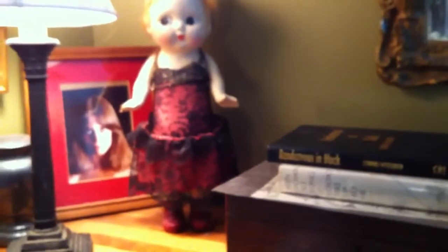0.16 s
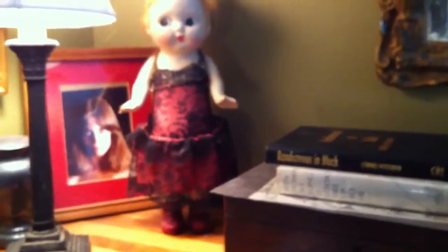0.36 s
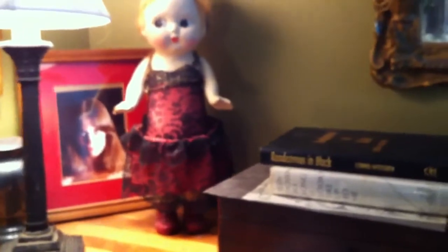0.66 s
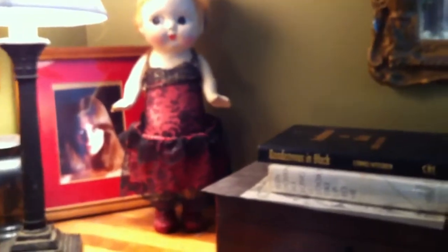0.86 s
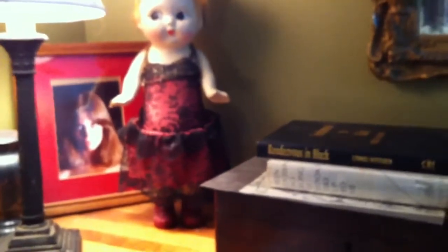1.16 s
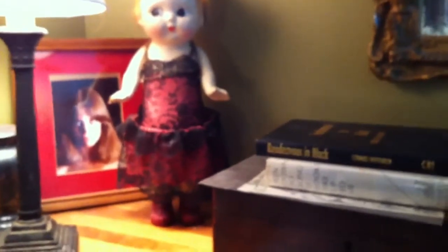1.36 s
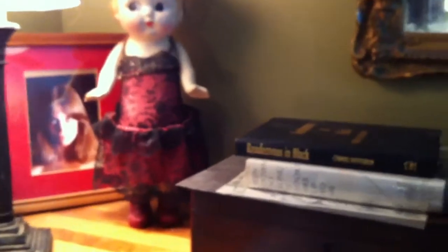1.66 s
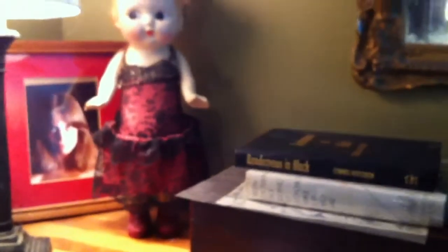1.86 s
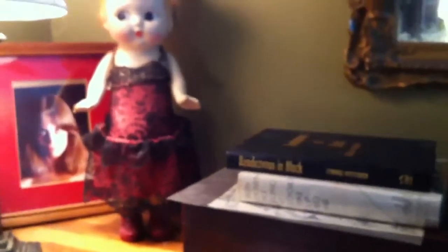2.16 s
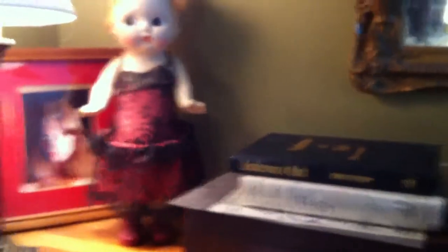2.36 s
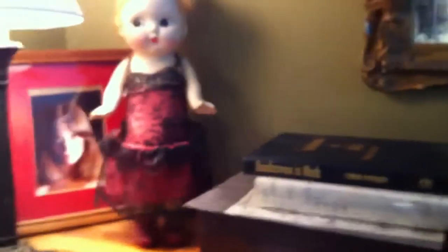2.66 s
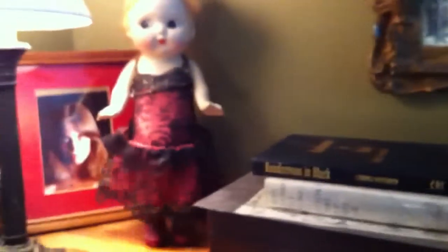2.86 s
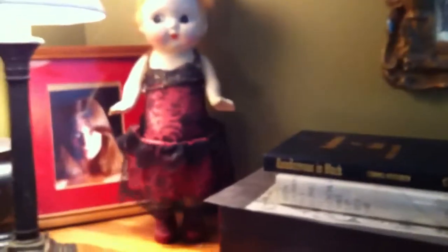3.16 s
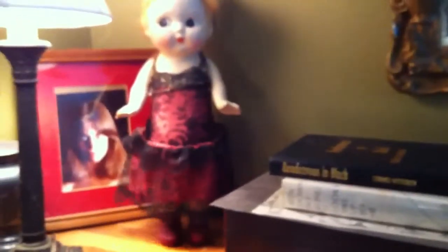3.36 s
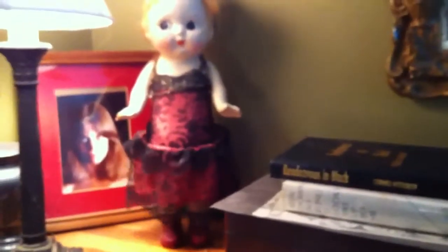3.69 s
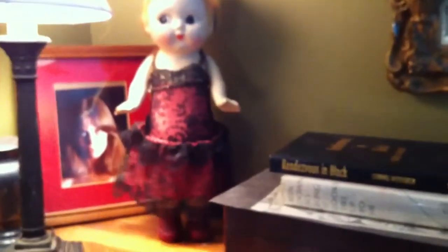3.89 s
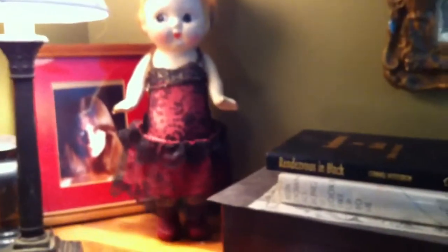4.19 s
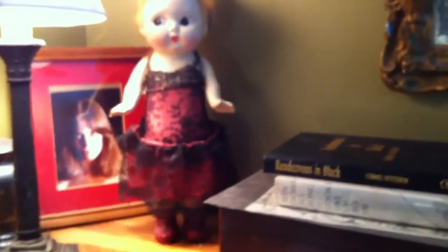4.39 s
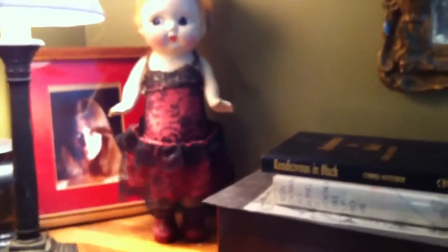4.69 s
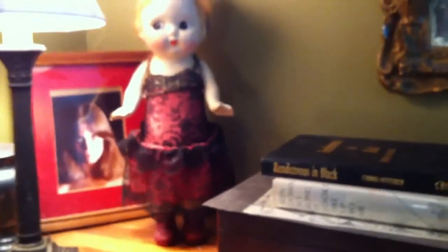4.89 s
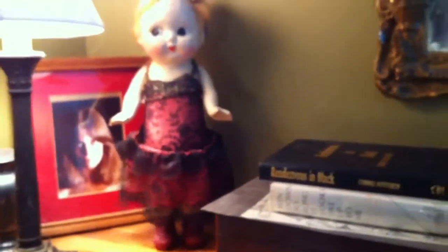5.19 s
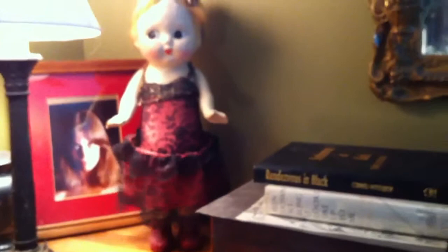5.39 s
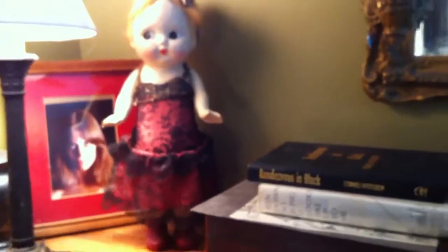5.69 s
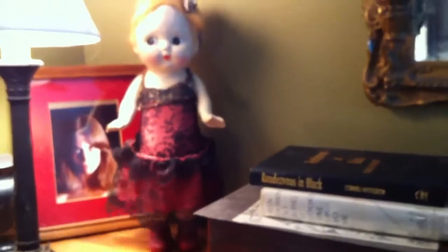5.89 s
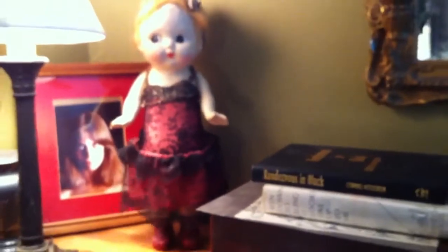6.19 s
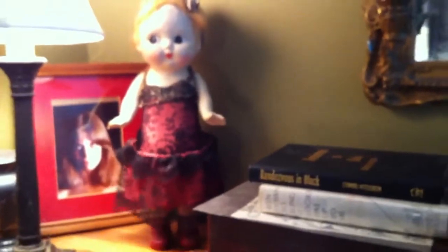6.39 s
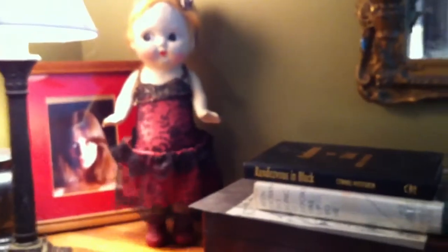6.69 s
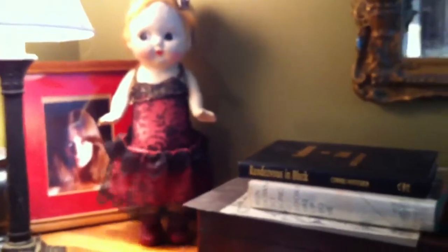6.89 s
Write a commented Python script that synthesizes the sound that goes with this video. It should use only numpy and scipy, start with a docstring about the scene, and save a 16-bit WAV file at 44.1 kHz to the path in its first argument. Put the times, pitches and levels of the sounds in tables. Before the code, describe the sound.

A quiet small room, heard closely through a small microphone with thin bass and low steady hiss. From 0 to 1.3 s there is almost nothing: a very faint, dull, even patter of about six pats a second, slight rustles and a tiny creak near 1.2 s. At 1.35 s a soft, airy brushing hiss swells, catches with a small snag at 1.8 s and trails off. At 2.05 s comes a short low juddering skid with a scrape, then two hard, cracking, boomy knocks on the wooden dresser at 2.35 and 2.55 s. Clockwork begins at 2.6 s: bright metallic chattering clicks, tick and tock in uneven pairs, roughly eight to ten a second, each with a tiny woody thud. The pace loosens around 3.7 to 4.7 s, tightens after 5 s, and loosens slightly near the end. Force varies from click to click. Very soft bumps fall near 3.7 and 6 s. It is still ticking at 7 s.

```python
"""A wooden dresser in a quiet room: a wind-up doll stands on it, heard through a small microphone close by.
A soft brushing hiss (shaped noise), a skidding shove and two knocks on the wood (ringing modes under noise
cracks) come first. Then the clockwork goes tick-tock in uneven pairs: each beat is a brief metal chatter
ringing the doll's shell, with a small thud below. Harder beats are brighter. A faint patter keeps an even
pace; slight rustles, creaks and bumps, a room tail and steady noise complete the scene."""
import sys
import numpy as np
from scipy import signal
from scipy.fft import rfft, irfft
from scipy.io import wavfile

SR = 44100
rng = np.random.default_rng(int(sys.argv[2]) if len(sys.argv) > 2 else 0)


def master_out(mix):
    """Clip the mix to full scale and print it as 16-bit PCM to the path in sys.argv[1]."""
    frames = np.transpose(np.atleast_2d(mix))
    ceiling = np.clip(frames, -1, 1)
    pcm = np.round(ceiling * 32767).astype(np.int16)
    wavfile.write(sys.argv[1], SR, pcm)


N = 310905

# beats of the clockwork, tick and tock by turns: nominal peak [t/s, level/dB]
BEATS = [(2.6058, -30), (2.6909, -25.5), (2.8217, -28), (2.9231, -28), (3.056, -28), (3.1515, -28.5),
         (3.285, -26.5), (3.382, -26), (3.5099, -26.5), (3.6384, -30.5), (3.8411, -27.5), (3.9422, -28.5),
         (4.1398, -26.5), (4.2444, -28.5), (4.4487, -27), (4.5609, -28.5), (4.7381, -25.5), (4.8405, -28.5),
         (4.9896, -27), (5.0818, -28.5), (5.2237, -24.5), (5.3178, -26), (5.4366, -26.5), (5.532, -26.5),
         (5.6487, -27), (5.7369, -26.5), (5.8564, -27), (5.9474, -30), (6.067, -27), (6.1493, -28),
         (6.2844, -29), (6.3762, -29), (6.5219, -25.5), (6.6184, -27.5), (6.8425, -27), (6.932, -24.5)]
# an ordinary tick, then tock [peak over rms/dB, brightness/dB per octave, thud level/dB]
STROKES = [(13.2, -0.9, -57), (13.9, 1.85, -62.5)]
# slow drift in the brightness of the chatter [t/s, tilt/dB per octave]
BRIGHTNESS_DRIFT = [(2.8, 1.3), (3.1, -0.3), (3.9, 1), (5.3, -0.26), (6.1, -0.7), (6.9, -0.8)]
# resonances of works and shell [f/Hz, width/Hz, level in a tick/dB, level in a tock/dB]
SHELL_MODES = [(1348, 33, -17.5, -12.5), (1760, 136, -9.5, -14.5), (2066, 670, -15.5, -19.5),
               (2453, 107, -11.5, -14), (2965, 230, -26, -17), (3520, 320, -16.5, -14),
               (5110, 546, -9.5, -8), (5910, 324, -8, -9.5), (6290, 220, -9, -14), (6985, 233, -5, -6.5),
               (8450, 630, -4, -4), (9260, 100, -1, -1), (9440, 175, -7.5, -8.5), (11270, 1140, -6, -9.5),
               (12530, 560, -1.5, -11.5), (14300, 500, -35, -56), (14520, 570, -7, -9.5)]
# resonances of the doll standing on the wood [f/Hz, width/Hz, level in a tick/dB, level in a tock/dB]
STANCE_MODES = [(155, 15.2, 0.5, -6.5), (220, 22.5, -1.5, -11.5), (290.5, 18.5, 5.5, -2),
                (340, 31.6, -4, -3.5), (398, 27.7, -2.5, 0), (475, 51, -10, -6), (638, 69, -19, -14),
                (946, 34, -24, -11)]
# soft low bumps of the doll on the wood [t/s, level/dB]
BUMPS = [(3.705, -62.5), (6.015, -64.5)]
# knocks on the dresser [t/s, boom level/dB, crack level/dB, crack brightness/dB per octave]
KNOCKS = [(2.3478, -26, -31, -2), (2.5528, -24.5, -28.5, -2)]
# modes of the dresser [f/Hz, width/Hz, level in first knock/dB, level in second knock/dB]
WOOD_MODES = [(154.8, 21, 0.5, -2), (195.2, 15, 3, 1), (229, 26.5, -2, -3.5), (267, 27, -7, 3),
              (278, 6.5, 6, 10.5), (291.7, 2.04, 1.5, 3.5), (387, 12.2, -1.5, 5), (414, 48, -7.5, -10),
              (467, 20, -7, -1.5), (557, 9.9, -15, -4.5), (610, 35, -12, -18), (667, 26, -14, -8),
              (724, 27, -9, -7), (718, 29, -3, -11.5), (866, 6.9, -14, -13), (885, 18, -34, -8.5),
              (1030, 26, -22, -29), (1050, 27, -23.5, -15), (1206, 12, -18.5, -23), (1300, 18, -27, -35),
              (1670, 33, -21, -33.5)]
# spectrum of a crack, also used for scrape and rustles [f/Hz, density/dB per Hz]
CRACK_COLOUR = [(100, 2.5), (400, 6.5), (800, -0.5), (1100, 1.5), (1700, -1), (2700, -1.5), (3300, -1),
                (4000, -6), (5000, -5), (8000, -6), (11000, -7)]
# spectrum of the crowd of weaker panel modes [f/Hz, density/dB per Hz]
PANEL_COLOUR = [(30, 6), (160, -1), (400, 7), (800, -1), (1100, -9), (1600, -11.5), (2500, -20),
                (4000, -42), (8000, -57)]
# spectrum of the brushing hiss [f/Hz, density/dB per Hz]
BRUSH_COLOUR = [(59, -49), (100, -24), (202, -4.5), (322, -8), (373, -2.5), (452, -12), (662, -7),
                (1170, -9.5), (2040, -8), (12700, -6.5), (16000, -10)]
# spectrum of a pat before its tilt [f/Hz, density/dB per Hz]
PAT_COLOUR = [(100, -12), (250, -6.5), (400, 1.5), (680, 4.5), (950, -9.5), (1700, -20.5), (3500, -14),
              (9000, -32)]
# loudness of the patter over time [t/s, level/dB]
PAT_LEVEL = [(.1, -66.5), (.45, -73), (.9, -73), (1.25, -64), (1.9, -68), (3.4, -75), (4.35, -66),
             (4.9, -71.5), (7, -80.5)]
# faint rustles of handling [t/s, level/dB, length/s]
RUSTLES = [(0.126, -69, 0.063), (0.593, -70, 0.051), (.745, -75, .04), (1.07, -68.5, 0.043)]
# faint creaks [t/s, f/Hz, width/Hz, level/dB, length/s]
CREAKS = [(1.189, 1750, 110, -70.5, 0.073), (1.198, 1600, 80, -70.5, 0.11), (4.26, 1100, 130, -68.5, 0.061)]
# reverberation of the room [f/Hz, time to fall 60 dB/s]
ROOM_DECAY = [(150, 0.34), (400, 0.46), (1200, 0.39), (3000, 0.32), (8000, 0.2), (16000, 0.2)]
# spectrum of the steady noise floor [f/Hz, density/dB per Hz]
FLOOR_COLOUR = [(15, -33.5), (25, -7), (49, -17.5), (170, -4), (405, -7.5), (575, -10), (796, -11),
                (1480, -13), (1610, -13.5), (2110, -15), (2690, -16), (3160, -15), (6560, -16.5),
                (13200, -16.5), (16000, -16.5)]

USUAL_DB = -27  # peak of an ordinary beat
BRIGHT_PER_DB, THUD_PER_DB = 0.76, 0.1  # what each dB of extra force adds to brightness and thud
LINGER_DB, LINGER_S = 20, 0.087  # the second knock's boom lingers under the first beats, then fades
BRUSH_START_S, BRUSH_ATTACK_S, BRUSH_HOLD_S, BRUSH_RELEASE_S = 1.346, 0.3, 0.18, 0.037
BRUSH_DB, TRAIL_SHARE, TRAIL_S = -56, 0.39, 0.44
PAT_START_S, PAT_RATE_HZ, PAT_SCATTER_DB = .114, 6.35, 1.1
PAT_BRIGHT_DB = -2.5  # tilt, dB an octave
FLOOR_DB, EDGE_HZ = -66.8, 15850  # steady noise level, top of the microphone's band


def amp(db):
    """Turns dB into a linear gain."""
    return 10 ** (np.asarray(db) / 20)


def unit(x):
    """Scales a sound to rms 1."""
    return x / np.sqrt(np.mean(x ** 2) + 1e-20)


def read(points, hz):
    """Reads a frequency curve, interpolating along log frequency."""
    f, value = np.transpose(points)
    return np.interp(np.log(hz + 1), np.log(f + 1), value)


def at_time(points, s):
    """Reads a time curve along straight lines."""
    return np.interp(s, *np.transpose(points))


def add(mix, s, sound):
    """Lays a sound into the mix at s seconds, cut off at the end."""
    part = mix[round(s * SR):][:len(sound)]
    part += sound[:len(part)]


def seconds(size):
    """Time axis of size samples."""
    return np.arange(size) / SR


def level(x, db, size):
    """Scales a sound so that its first size samples have the given rms level."""
    return amp(db) * x / np.sqrt(np.mean(x[:size] ** 2) + 1e-20)


def noise(colour, size):
    """Noise of rms 1 with the given spectrum."""
    spectrum = rfft(rng.standard_normal(size))
    gain = amp(read(colour, np.fft.rfftfreq(size, 1 / SR)))
    return unit(irfft(spectrum * gain, size))


def brighten(x, db, pivot_hz):
    """Tilts the spectrum by db an octave round the pivot, levelling off one octave either side."""
    octaves = np.log2(np.fft.rfftfreq(len(x), 1 / SR) / pivot_hz + 1e-9)
    return irfft(rfft(x) * amp(db * np.clip(octaves, -1, 1)), len(x))


def ring(modes, column, size, spread_db=0, detune=0):
    """Impulse response of a body: decaying modes, whose heights depend on where it is struck."""
    t, chance = seconds(size), rng.standard_normal((len(modes), 2))
    body = np.zeros(size)
    for k, (hz, width, *db) in enumerate(modes):
        height = amp(db[column] + spread_db * chance[k, 0])
        decay = width * np.exp(-np.pi * width * t)  # a wider mode dies sooner
        tone = np.cos(2 * np.pi * hz * (1 + detune * chance[k, 1]) * t)
        body += (-1) ** k * height * decay * tone
    return body


def clockwork(lead_s=.0005, spread_db=1.5, pivot_hz=8000):
    """Each beat rings the shell, a little differently as the wheels turn, and jolts the doll on its feet."""
    clicks, thuds = np.zeros(N), np.zeros(N)
    for k, (s, peak_db) in enumerate(BEATS):
        column, force_db = k % 2, peak_db - USUAL_DB
        crest_db, bright_db, thud_db = STROKES[column]
        bright_db += BRIGHT_PER_DB * force_db + at_time(BRIGHTNESS_DRIFT, s)
        shell = ring(SHELL_MODES, column, size=2048, spread_db=spread_db, detune=.015)
        click = brighten(signal.fftconvolve(chatter(), shell), bright_db, pivot_hz)
        add(clicks, s - lead_s, level(click, peak_db - crest_db, size=441))
        linger_db = LINGER_DB * np.exp((BEATS[0][0] - s) / LINGER_S)
        add(thuds, s, thud(column, thud_db + THUD_PER_DB * force_db + linger_db))
    return np.array([clicks, thuds])


def chatter(skip_s=0.0021, rebound_share=0.24, rebound_s=0.0057, rattle_share=0.4, rattle_s=0.0065):
    """A tooth skips over the pallet: a dense cluster of tiny impacts, a rebound, then a dying rattle."""
    t = seconds(size=2048)
    # every beat varies in skip length, rebound strength and rebound delay
    slow, hard, late = 1 + np.array([.18, .5, .18]) * rng.uniform(-1, 1, 3)
    u = t / (skip_s * slow)
    skip = 2.3 * u * np.exp(-1.4 * u ** 2)
    rebound = rebound_share * hard * np.exp(-((t - rebound_s * late) / 0.0024) ** 2)
    rattle = rattle_share * np.exp(-t / rattle_s) * np.minimum(u, 1)
    impacts = (skip + rebound + rattle) * rng.standard_normal(len(t))
    spectrum = rfft(impacts, 2 * len(t))
    # partly even out the chance ripples in the burst's spectrum, so beats keep a similar colour
    return irfft(spectrum / (abs(spectrum) + 1e-9) ** .35)[:len(t)]


def thud(column, db, size=36):
    """A push through the feet rings the doll on the wood; a longer push (size, in samples) is duller."""
    stance = ring(STANCE_MODES, column, size=16384, spread_db=1.5, detune=.008)
    push = signal.windows.hann(size)
    return level(signal.fftconvolve(stance, push), db, size=1764)


def bumps():
    """Between beats the doll now and then shifts its weight, a slow push that thuds dully."""
    out = np.zeros(N)
    for s, db in BUMPS:
        add(out, s, thud(0, db, size=260))
    return out


def knocks(crack_s=0.0055, rattle=0.21, rattle_s=0.034, panel_db=-6, panel_s=0.033):
    """A hard contact cracks, loose things rattle briefly, and the dresser booms with all its panels."""
    cracks, booms, t = np.zeros(N), np.zeros(N), seconds(size=16384)
    for column, (s, boom_db, crack_db, bright_db) in enumerate(KNOCKS):
        shape = np.exp(-t / crack_s) + rattle * np.exp(-t / rattle_s)
        shape *= 1 - np.exp(-t / 0.00086)  # soft onset
        crack = brighten(noise(CRACK_COLOUR, len(t)), bright_db, pivot_hz=4060) * shape
        add(cracks, s, level(crack, crack_db, size=441))
        wood = ring(WOOD_MODES, column, size=44100)
        boom = signal.fftconvolve(wood, signal.windows.hann(24))
        add(booms, s, level(boom, boom_db, size=1764))
        panels = noise(PANEL_COLOUR, len(t)) * np.exp(-t / panel_s) * (1 - np.exp(-t / 0.0051))
        add(booms, s, level(panels, boom_db + panel_db, size=1764))
    return np.array([cracks, booms])


def shove(s=2.0535, judder_hz=229, judder_db=-30, judder_s=0.023, scrape_db=-46, ring_db=-54):
    """A short skid: the foot judders, scrapes and leaves the wood ringing."""
    scrape, wood, t = np.zeros(N), np.zeros(N), seconds(size=30000)
    grip = np.sin(np.pi * np.minimum(t / judder_s, 1))
    add(wood, s + 0.0046, amp(judder_db) * grip * np.sin(2 * np.pi * judder_hz * t))
    add(wood, s + 0.01284, amp(ring_db) * np.sin(2 * np.pi * 286 * t) * np.exp(-t / 0.23))
    add(scrape, s, amp(scrape_db) * noise(CRACK_COLOUR, len(t)) / np.sqrt(1 + (t / 0.033) ** 6))
    return np.array([scrape, wood])


def brush(snag_s=1.7835, snag_db=-42):
    """Something smooth brushes past: its hiss swells, holds, drops away and trails off, catching once."""
    age = seconds(N) - BRUSH_START_S
    swell = np.sin(np.pi / 2 * np.clip(age / BRUSH_ATTACK_S, 0, 1)) ** 2
    late = np.maximum(age - BRUSH_ATTACK_S - BRUSH_HOLD_S, 0)
    drop = (1 - TRAIL_SHARE) * np.exp(-late / BRUSH_RELEASE_S)
    trail = TRAIL_SHARE * np.exp(-(late / TRAIL_S) ** 2)
    out = amp(BRUSH_DB) * noise(BRUSH_COLOUR, N) * swell * (drop + trail)
    t = seconds(size=1024)
    snag = brighten(noise(BRUSH_COLOUR, len(t)), -4, pivot_hz=6000) * np.exp(-t / .002)
    add(out, snag_s, amp(snag_db) * snag)
    return out


def pats(swell_s=0.022):
    """Dull, soft-edged pats of noise at an even pace, drifting in and out of hearing."""
    out, u = np.zeros(N), seconds(size=8192) / swell_s
    for s in PAT_START_S + np.arange(N / SR * PAT_RATE_HZ) / PAT_RATE_HZ:
        db = at_time(PAT_LEVEL, s) + PAT_SCATTER_DB * rng.standard_normal()
        pat = unit(brighten(noise(PAT_COLOUR, len(u)), PAT_BRIGHT_DB, pivot_hz=397))
        add(out, s, amp(db) * pat * u * np.exp(1 - u))
    return out


def rustles(bright_db=-4):
    """Short, soft swells of rubbing noise."""
    out = np.zeros(N)
    for s, db, length_s in RUSTLES:
        rub = noise(CRACK_COLOUR, round(length_s * SR))
        touch = unit(brighten(rub, bright_db, pivot_hz=4000))
        add(out, s, amp(db) * touch * signal.windows.hann(len(touch)))
    return out


def creaks():
    """Brief rubbing noise in one narrow resonance."""
    out = np.zeros(N)
    for s, hz, width, db, length_s in CREAKS:
        resonance = ring([(hz, width, 0)], column=0, size=2048)
        friction = rng.standard_normal(round(length_s * SR) + 2047)
        rub = signal.fftconvolve(friction, resonance, "valid")
        add(out, s, amp(db) * unit(rub) * signal.windows.hann(len(rub)))
    return out


def room(x, build_s=0.0021):
    """Diffuse tail of a small room: three random tails cross-fade slowly, so it varies from beat to beat."""
    out = np.zeros(N)
    for k in range(3):
        hz, t, z = signal.stft(rng.standard_normal(SR), SR, nperseg=256)
        decay = amp(-60 * t / read(ROOM_DECAY, hz)[:, None])
        tail = signal.istft(z * decay, SR, nperseg=256)[1]
        tail = tail * (1 - np.exp(-(seconds(len(tail)) / build_s) ** 2))
        # the three fades keep a constant total power
        fade = np.sqrt(2 / 3) * np.cos(2 * np.pi * (.7 * seconds(N) + k / 3))
        out += signal.fftconvolve(x * fade, tail / np.linalg.norm(tail))[:N]
    return out


def scene():
    """Mixes all sources; clockwork, bumps, knocks and shove also feed the room."""
    clicks, thuds = clockwork()
    thuds = thuds + bumps()
    cracks, booms = knocks() + shove()
    send = amp(-6.5) * clicks + amp(-8.5) * cracks + amp(-3.5) * thuds + amp(-15) * booms
    struck = clicks + cracks + thuds + booms
    return (struck + room(send) + brush() + rustles() + creaks() + pats())[None]


def record(dry, low_cut_hz=138):
    """The microphone's steep bass cut and its steady noise floor, then the band limit."""
    cut = signal.sosfilt(signal.butter(7, low_cut_hz, "high", fs=SR, output="sos"), dry)
    deep = signal.sosfilt(signal.butter(2, 90, fs=SR, output="sos"), dry)
    heard = cut + amp(-22) * deep  # a little deep bass survives the cut
    heard = heard + amp(FLOOR_DB) * noise(FLOOR_COLOUR, N)
    band = signal.firwin(511, EDGE_HZ, window=("kaiser", 8), fs=SR)
    return signal.oaconvolve(heard, band[None], "same")


dry = scene()
out = record(dry)
master_out(out)
```